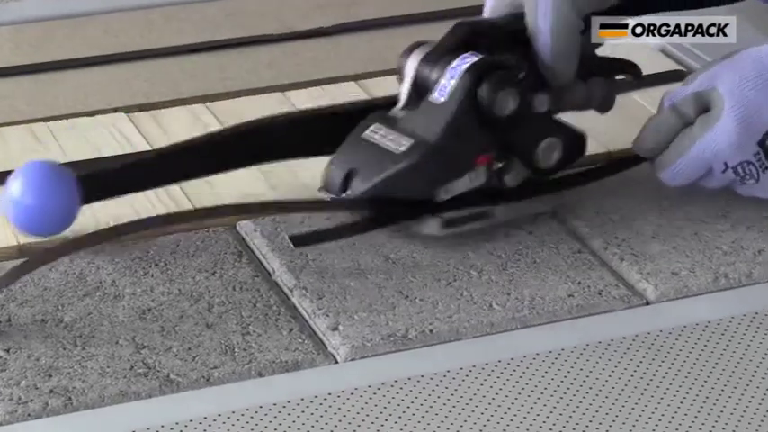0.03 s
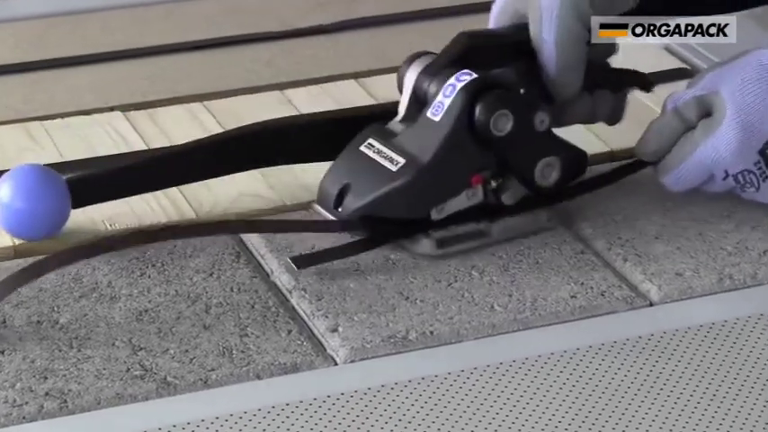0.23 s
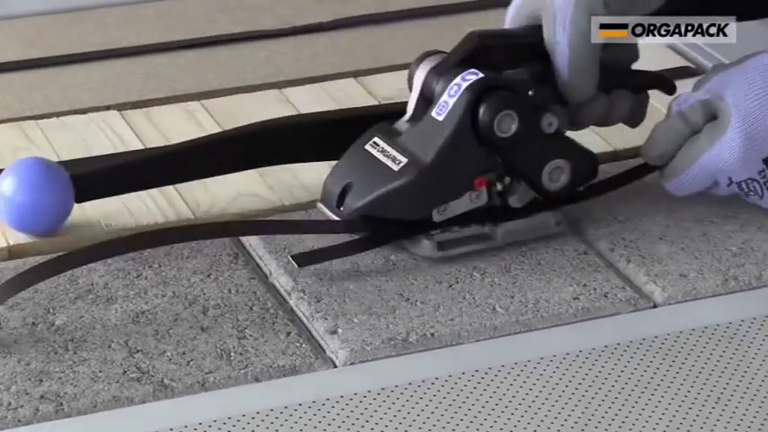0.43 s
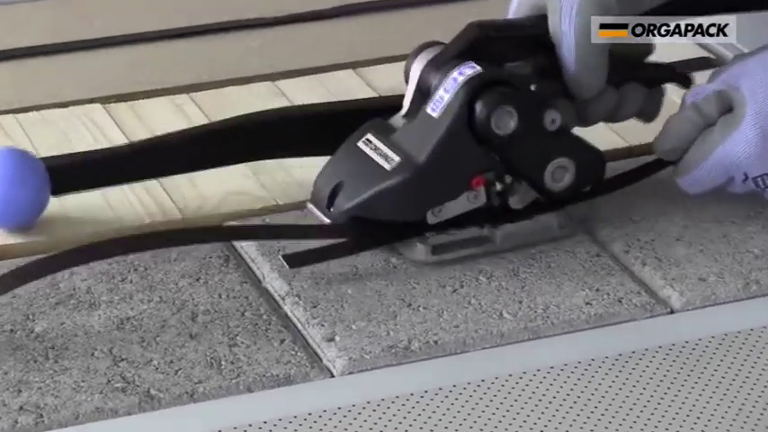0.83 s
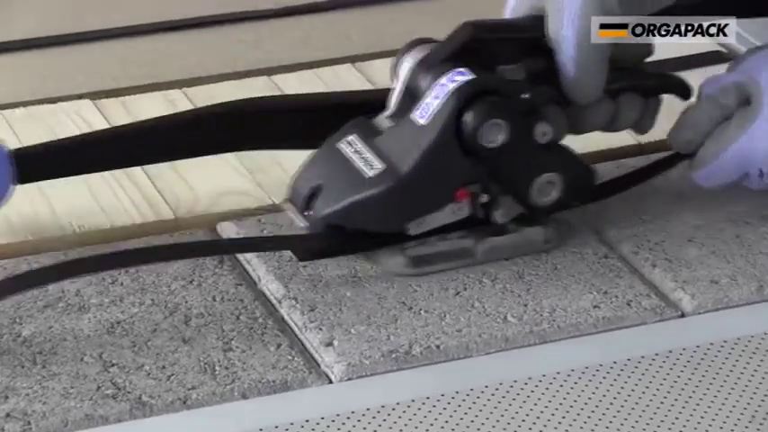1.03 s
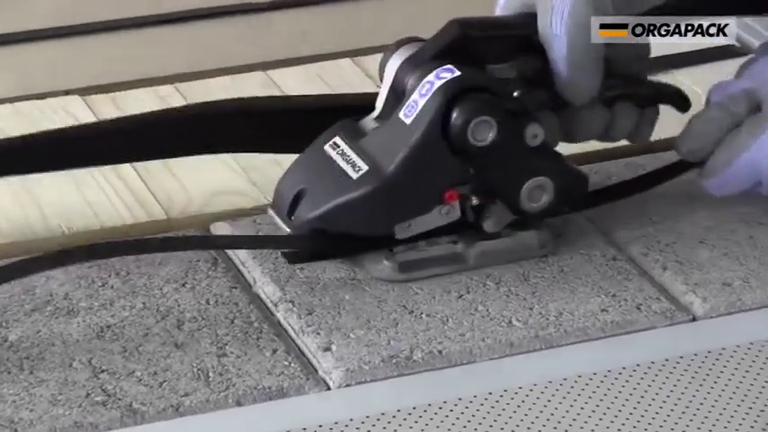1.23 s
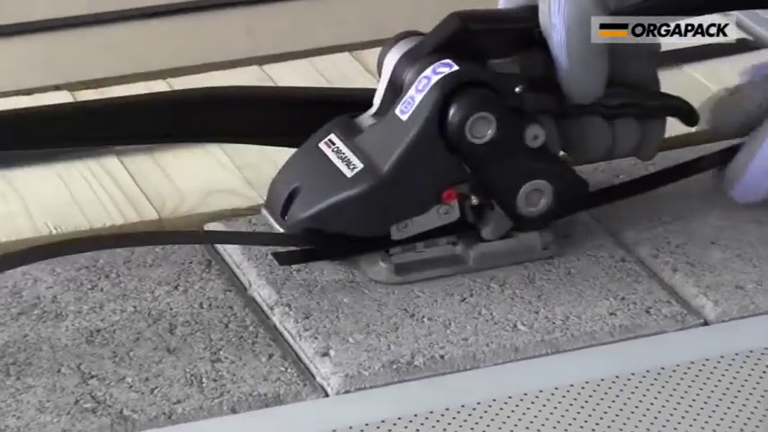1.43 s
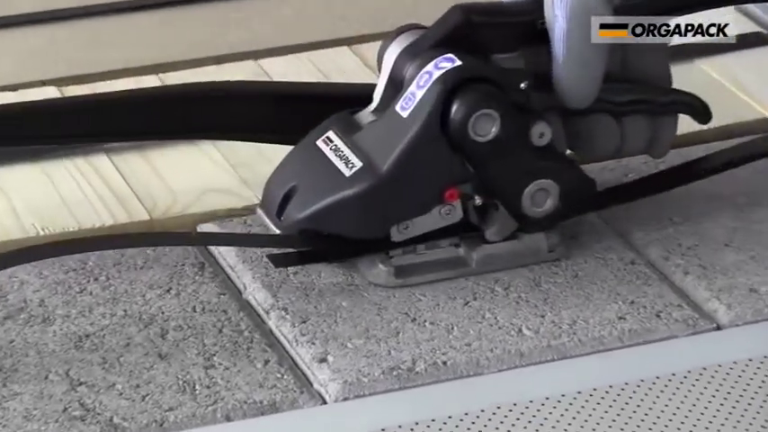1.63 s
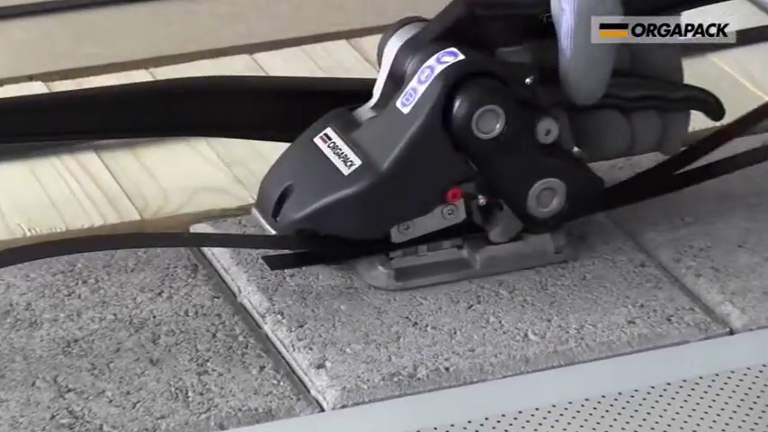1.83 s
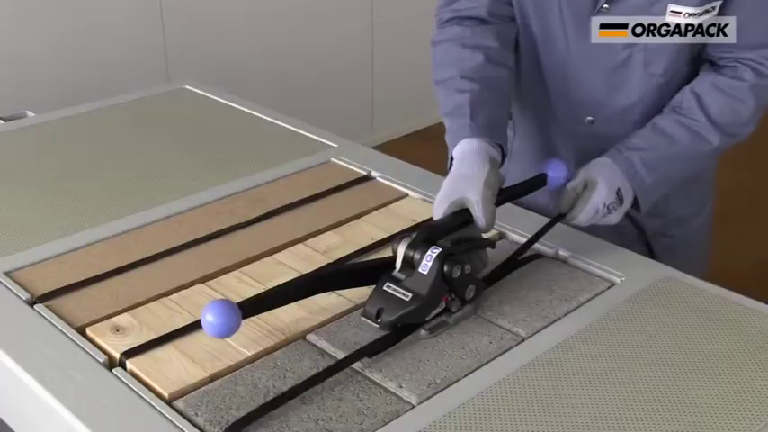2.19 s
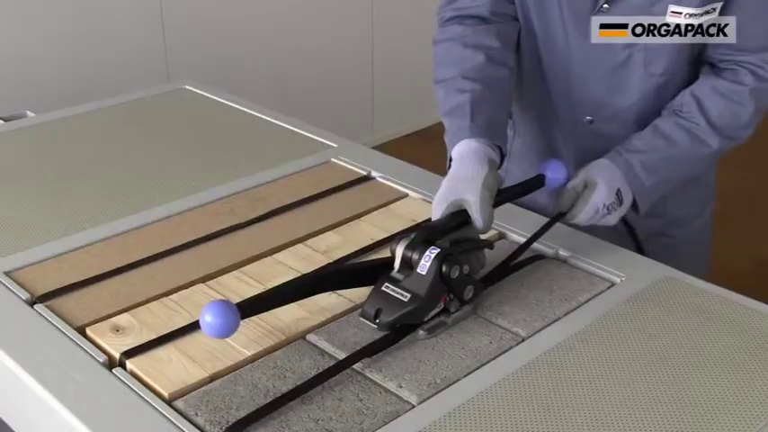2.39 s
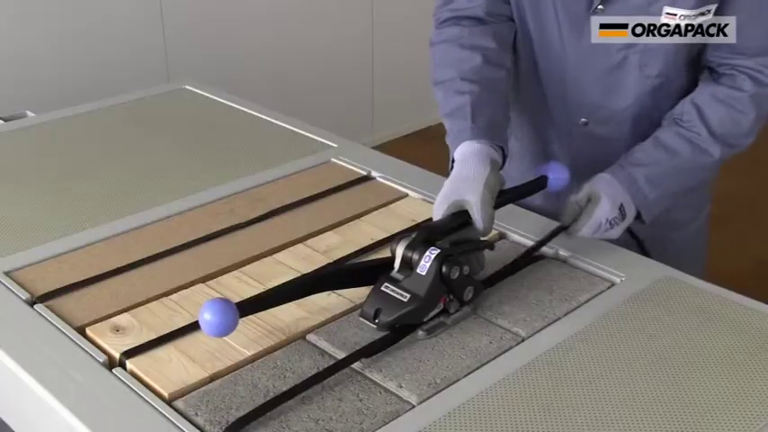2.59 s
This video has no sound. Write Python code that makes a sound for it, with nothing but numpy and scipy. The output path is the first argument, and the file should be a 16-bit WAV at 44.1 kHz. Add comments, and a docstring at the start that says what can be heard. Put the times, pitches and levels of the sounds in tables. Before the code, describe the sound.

A hand strapping tool knocks down onto paving stones from 0.2 seconds, steel strap clashing in its jaws, loudest between 0.8 and 1.1 seconds. The table beneath rings, and softer bumps and strap rubbing follow. From 1.9 to 2.25 seconds the ratchet gives a quickening run of sharp clicks, then snaps home at 2.5 seconds. The workshop echoes and ventilation hums quietly throughout.

```python
"""An echoing workshop, with ventilation humming in the background.
A hand strapping tool is set down on a load of pavers and planks: its base knocks and the table rings.
Steel strap slides through a hand and clashes into the tool's jaws. Then the lever swings, and the pawl
(a small steel catch) drops over the ratchet teeth in a quickening run of clicks before it snaps home."""
import sys
import numpy as np
from scipy import signal
from scipy.fft import rfft, irfft
from scipy.io import wavfile

SR = 44100
rng = np.random.default_rng(int(sys.argv[2]) if len(sys.argv) > 2 else 0)


def store_pcm(level_fs):
    """Save levels as 16-bit WAV."""
    pcm = np.round(np.clip(level_fs, -1, 1) * 32767).astype(np.int16)
    wavfile.write(sys.argv[1], SR, np.atleast_2d(pcm).T)


N = 121275

# Dull knocks and rubs. Each row: start in seconds, level in dB, rise and fade times in seconds,
# thin below this Hz, dull above this Hz, table ring in dB, contact resonance in Hz, its height in dB.
# A fade time is how long a sound takes to fall by 60 dB.
KNOCKS = [(.2025, -15.5, 0.00069, 0.051, 373, 1700, -21, 643, 11.5),
          (.281, -20, 0.0076, 0.23, 340, 1030, 8, 456, 7), (.639, -15, 0.0066, .24, 308, 1080, -2, 357, 7),
          (.8268, -8, .0005, 0.078, 240, 1970, -12.5, 635, 7),
          (.894, -9.5, 0.0033, .24, 248, 1750, -3, 333, 6),
          (.956, -12.5, 0.00056, 0.075, 540, 1840, -9, 1400, 0),
          (1.0588, -7, 0.0012, 0.13, 357, 1640, -12.5, 1070, 6.5),
          (1.078, -15.5, 0.0018, 0.082, 139, 1190, -5, 487, 5),
          (1.093, -12.5, 0.0045, 0.073, 375, 1250, -4, 760, 0),
          (1.245, -22, 0.0033, 0.23, 129, 920, -6.5, 655, 2.5),
          (1.295, -23, 0.0017, 0.13, 100, 1120, -5, 670, 4),
          (1.385, -27, 0.022, 0.29, 99.2, 688, 2, 353, 9.5),
          (1.588, -30, .002, 0.057, 80, 1280, -18, 131, 9),
          (1.865, -31, 0.029, 0.84, 564, 1290, -4, 810, -4),
          (2.15, -27.5, 0.011, 0.27, 454, 1060, 7.5, 680, 2.5),
          (2.4879, -22, 0.00071, .06, 700, 2310, -17, 1080, -3),
          (2.498, -23.5, 0.00045, 0.032, 795, 2700, -28, 1410, -18)]
# Tone of the sliding strap and of the crack in each click. Each row: frequency in Hz, level in dB.
FRICTION_TONE = [(500, -10), (1500, 5.5), (3000, 1), (5800, -5), (9000, -11.5), (15000, -21)]


def amp(db):
    """Turns decibels into a number to multiply by."""
    return 10 ** (np.asarray(db) / 20)


def unit(x):
    """Scales a signal to an average power of 1."""
    return x / np.sqrt(np.mean(x ** 2) + 1e-20)


def read(points, hz):
    """Reads between the rows of a table, on a pitch-like (logarithmic) frequency scale."""
    row_hz, value = np.transpose(points)
    return np.interp(np.log(hz + 1), np.log(row_hz + 1), value)


def add(mix, start, sound):
    """Mixes a sound in at a start time in seconds."""
    part = mix[max(round(start * SR), 0):][:len(sound)]
    part += sound[:len(part)]


def colour(x, tone, dull_hz=None):
    """Filters a sound to follow a tone curve, and can dull its treble. Only the curve's shape counts."""
    hz = abs(np.fft.fftfreq(4096, 1 / SR))
    gain = amp(read(tone, hz))
    if dull_hz:
        gain = gain / np.sqrt(1 + (hz / dull_hz) ** 6)
    log_gain = np.log(unit(gain) + 1e-5)
    taps = np.fft.ifft(np.exp(np.conj(signal.hilbert(log_gain)))).real  # nothing sounds before a hit
    return signal.fftconvolve(x, taps[:len(taps) // 2])[:len(x)]


def ring(modes, t):
    """Adds up modes (steady pitches that fade away); neighbours swing opposite ways."""
    return sum((-1) ** k * amp(db - 60 * t / fade) * np.sin(2 * np.pi * hz * t)
               for k, (hz, db, fade) in enumerate(modes))


def burst(t, rise, fade):
    """A loudness shape that climbs in a straight line, then dies away."""
    return np.minimum(t / rise, 1) * np.exp(-np.log(1000) * np.maximum(t - rise, 0) / fade)


def thinned(hz, thin_hz):
    """The bass that a light, glancing blow lacks, in dB."""
    return -10 * np.log10(1 + (thin_hz / hz) ** 4)


def bump(hz, peak_hz, peak_db, width_octaves=0.11):
    """The narrow peak or dip that one point of contact gives to the tone, in dB."""
    return peak_db * np.exp(-(np.log2(hz / peak_hz) / width_octaves) ** 2)


def spread(mid, side, width):
    """Makes left and right from a shared part and a part that differs."""
    return np.array([mid + width * side, mid - width * side]) / np.sqrt(1 + width ** 2)


def ventilation():
    """Rushing air with a low hum and a faint tone; the rush steps up a little near the end."""
    # Tone of the moving air. Each row: frequency in Hz, level in dB.
    air_tone = [(20, -23), (45, -18), (75, -19.5), (110, -4.5), (180, 3.5), (300, -5), (500, -5),
                (800, -9.5), (1400, -12.5), (2500, -26), (6000, -33.5), (15000, -47.5)]
    # Low ventilation hum, plus a faint steady tone near the table's ringing pitch.
    # Each row: centre in Hz, level in dB, width in Hz.
    tone_bands = [(190.4, -43.5, 14.5), (489, -51.5, 18), (74.1, -50.5, 6)]
    hz = np.fft.rfftfreq(N, 1 / SR)

    def noise(gain):
        return unit(irfft(rfft(rng.standard_normal(N)) * gain, N))
    air_gain = amp(read(air_tone, hz))
    side_gain = air_gain * np.minimum(.5 + hz / 1000, 2)  # the treble is wider than the bass
    air = spread(noise(air_gain), noise(side_gain), width=0.32)
    tones = sum(amp(db) * noise(1 / (1 + (2 * (hz - centre) / width) ** 2))
                for centre, db, width in tone_bands)
    step_up = np.clip((np.arange(N) / SR - 1.88) / 0.036, 0, 1)  # begins at 1.88 seconds
    return amp(-39 + 2.5 * step_up) * air + tones


def room_tail(width, build_s):
    """Countless blurred echoes take a moment to build, then die at their own speed in each band."""
    # How long the room rings. Each row: frequency in Hz, fade time in seconds.
    fade_times = [(150, 2.5), (350, 1.38), (700, 1.56), (1400, 1.38), (2200, 1.62), (5500, 0.84),
                  (8000, 0.61), (14000, 0.15)]
    # Tone of the room. Each row: frequency in Hz, level in dB.
    room_tone = [(100, -1.5), (500, 2.5), (1200, -1), (2500, 1), (5000, -4), (8000, -0.5), (14000, 8)]
    hz, t, bands = signal.stft(rng.standard_normal((2, 3 * SR // 2)), SR, nperseg=256)
    decay = np.exp(-np.log(1000) * t / read(fade_times, hz)[:, None])
    _, tail = signal.istft(bands * decay * amp(read(room_tone, hz))[:, None], SR, nperseg=256)
    build = np.minimum(np.arange(tail.shape[1]) / SR / build_s, 1)
    mid, side = tail * build / np.sqrt(SR / 10)
    return spread(mid, side, width)


def room(source, tail_db, width, build_s=0.0069, count=3):
    """Direct sound, first echoes and tails: each direction gets its own version of the source."""
    # The first echoes. Each row: delay in seconds, level in dB.
    echoes = [(.0108, -7), (.0128, -13), (.0188, -19)]
    directions = [source() for _ in range(count)]
    tails = sum(signal.fftconvolve(x[None], room_tail(width, build_s), axes=1)[:, :N]
                for x in directions)
    out = amp(tail_db) / np.sqrt(count) * tails
    for k, (delay, db) in enumerate(echoes):
        for channel, share in zip(out, spread(0.83, (-1) ** k, width)):  # lean left and right in turn
            add(channel, delay, amp(db) * share * directions[k % count])
    return out + directions[0]


def table_ring():
    """Each knock sets the table ringing; the ring swells more slowly after a soft contact."""
    # The table's natural tones. Each row: frequency in Hz, level in dB, fade time in seconds.
    modes = [(132.5, -15.5, 2.1), (183.3, -17, 0.94), (236, -8, 2.04), (320.7, -26, 1.6), (354, -11, 1.42),
             (410, -34, 0.42), (478.5, -2, 0.79), (558, -15, 1.4), (666, -8.5, 1), (714, -10, 0.21),
             (751, -23, 0.92), (815, -32, 0.41), (976, -21, 0.74), (1170, -31, 0.77), (1400, -34, 0.49)]
    out, t = np.zeros(N), np.arange(SR) / SR
    tones = np.array([ring([mode], t) for mode in modes])
    hz = np.array(modes)[:, 0]
    for start, db, rise, _, thin_hz, _, ring_db, peak_hz, peak_db in KNOCKS:
        shares = amp(thinned(hz, thin_hz) + bump(hz, peak_hz, peak_db)) * (-1) ** np.arange(len(hz))
        swell = np.minimum(t / (3.3 * rise), 1)
        add(out, start, amp(db + ring_db - 4) * (shares @ tones) * swell)
    return out


def knocks_and_rubs():
    """Dull bursts of chatter: the base landing, a soft rub, the thud of the pawl snapping home."""
    # Tone that all knocks share. Each row: frequency in Hz, level in dB.
    knock_tone = [(50, -37), (120, -8), (220, 1.5), (380, -2), (500, -5.5), (650, -0.5), (950, -1.5),
                  (1350, -3.5), (1750, -10.5), (2300, -17.5), (4000, -19), (15000, 6)]
    out, t, hz = np.zeros(N), np.arange(SR // 3) / SR, np.geomspace(40, 16000, 120)
    for start, db, rise, fade, thin_hz, dull_hz, _, peak_hz, peak_db in KNOCKS:
        chatter = rng.choice([-1., 1.], len(t)) * burst(t, rise, fade)
        levels = read(knock_tone, hz) + thinned(hz, thin_hz) + bump(hz, peak_hz, peak_db)
        add(out, start, amp(db) * colour(chatter, np.c_[hz, levels], dull_hz))
    return out


def strap_slides():
    """Soft swells of rubbing noise as the strap is drawn through the hand."""
    # Pulls on the strap. Each row: middle in seconds, half length in seconds, level in dB.
    pulls = [(0, 0.22, -46), (1.603, 0.18, -47), (1.916, 0.029, -37.5), (2.086, 0.066, -32.5)]
    t = np.arange(N) / SR
    swells = sum(amp(db) * np.exp(-((t - middle) / half) ** 2) for middle, half, db in pulls)
    return swells * colour(rng.standard_normal(N), FRICTION_TONE)


def strap_clashes():
    """Strap and jaws meet in bursts of tiny bright contacts."""
    # Steel hitting steel. Each row: start in seconds, level in dB, rise and fade times in seconds,
    # dull above this Hz, contact resonance in Hz, its height in dB.
    clashes = [(0.2021, -40, .0005, 0.096, 6000, 2420, 17), (.256, -40, .002, 0.13, 11640, 3100, 13),
               (.262, -42.5, 0.018, .2, 4430, 3180, 7), (0.415, -38, 0.0017, 0.026, 10800, 8600, 14),
               (.425, -33.5, .001, 0.034, 7000, 4200, 5), (0.461, -43, 0.0015, 0.17, 5900, 4500, -1),
               (.660, -40.5, 0.0029, 0.097, 13000, 4450, 9), (.673, -25.5, 0.0028, 0.027, 11000, 4040, 6),
               (0.683, -34, 0.0051, 0.13, 11900, 9000, -1), (0.708, -32, 0.0027, 0.066, 12000, 8500, 10),
               (.811, -37, .002, .04, 5000, 3060, 12), (0.826, -36.5, 0.0006, 0.27, 6400, 4500, 9),
               (0.886, -24, 0.0011, 0.035, 7000, 3220, 20),
               (0.889, -9.5, 0.00056, 0.026, 10100, 6030, -0.5),
               (0.901, -28.5, 0.0017, 0.074, 10100, 4700, 10), (1.045, -16, 0.0018, 0.046, 13000, 8800, 11),
               (1.062, -15, 0.004, 0.12, 16000, 4240, 4), (1.414, -38.5, 0.0011, 0.038, 12000, 9000, 4),
               (1.63, -44, 0.023, 0.17, 7500, 2100, 17)]
    # Tone of the steel. Each row: frequency in Hz, level in dB.
    steel_tone = [(300, -24), (1500, 0), (3000, -1), (4000, -1), (6000, -0.5), (8500, -4.5), (11000, -4.5),
                  (13000, -1.5), (16000, -6)]
    out, t, hz = np.zeros(N), np.arange(SR // 3) / SR, np.geomspace(300, 16000, 90)
    for start, db, rise, fade, dull_hz, peak_hz, peak_db in clashes:
        sizes = np.repeat(rng.standard_normal(len(t)), 16)[:len(t)]  # a new contact every 16 samples
        grain_db = 5 * np.clip(sizes, -2, 2)
        grains = unit(rng.standard_normal(len(t)) * amp(grain_db))
        levels = read(steel_tone, hz) + bump(hz, peak_hz, peak_db)
        add(out, start, amp(db) * colour(grains * burst(t, rise, fade), np.c_[hz, levels], dull_hz))
    return out


def click(modes):
    """A steel catch lands with a crack, rings briefly and bounces once."""
    longest_fade = max(fade for _, _, fade in modes)
    t = np.arange(0, longest_fade + .01, 1 / SR)
    crack = amp(-18.5) * rng.standard_normal(SR)[:len(t)] * burst(t, rise=.0001, fade=0.0023)
    landing = ring(modes, t) + colour(crack, FRICTION_TONE)
    out = landing.copy()
    bounce_s = .0009 * rng.uniform(0.46, 1.6)
    add(out, bounce_s, amp(-3) * landing)
    return out


def ratchet():
    """The pawl drops over each tooth, shaking the housing, then snaps home; faint high tones linger."""
    # Drops over the teeth. Each row: start in seconds, level in dB, housing rattle in dB.
    teeth = [(1.904, -11.5, -26.5), (1.9644, -11, -21), (2.0056, -11.5, -22), (2.0312, -7, -19),
             (2.0512, -17, -19), (2.0732, -8.5, -19), (2.0936, -7.5, -19), (2.1137, -10, -16.5),
             (2.133, -10.5, -20.5), (2.1497, -3.5, -20.5), (2.1638, -1.5, -21.5), (2.176, -1, -27),
             (2.1872, -4, -27.5), (2.1984, -1.5, -26), (2.2122, -4.5, -34), (2.2374, -2, -19.5)]
    # The pawl snapping home and settling. Each row: start in seconds, level in dB.
    snaps = [(2.487, -5.5), (2.498, -30)]
    # Three sets of fading tones. Each row: frequency in Hz, level in dB, fade time in seconds.
    pawl_modes = [(1180, -16.5, .006), (2120, -14.5, 0.0085), (3470, -8, .005), (4390, -4.5, 0.0028),
                  (5030, -4.5, 0.0051), (5940, -4.5, 0.0049), (8000, -12, 0.0094), (10800, -17, 0.0056),
                  (14000, -27.5, .005)]  # the pawl on a tooth
    snap_modes = [(1080, -10.5, .016), (1330, -17, 0.011), (2480, -15, 0.0063), (3500, -9.5, 0.0068),
                  (4500, -7, 0.0052), (5160, -3.5, 0.0052), (8120, -6, 0.011), (8060, -41, 0.23),
                  (10500, -16, 0.0034), (13700, -35, .004)]  # the pawl snapping home
    lingering_tones = [(2087, -41, 1.2), (2234, -42, 1), (3477, -43, .9), (4995, -46, .6), (5184, -42, .7),
                       (5986, -43, .6)]  # faint high tones that linger in the room after the clicks
    # Tone of the rattling housing. Each row: frequency in Hz, level in dB.
    housing_tone = [(40, -48), (100, -33), (250, -3.5), (650, 0.5), (1200, 2.5), (1750, -8), (2150, -0.5),
                    (3000, -3), (4500, -10), (8000, -18.5), (15000, -41)]
    pitch_scatter, treble_hz = 0.032, 7000
    out, shake, t = np.zeros(N), np.zeros(N), np.arange(SR // 8) / SR
    lingering = ring(lingering_tones, np.arange(SR) / SR)
    for start, db in snaps:
        add(out, start, amp(db) * click(snap_modes))
        add(out, start, amp(db - 9) * lingering)
    for start, db, rattle_db in teeth:
        modes = []
        for hz, mode_db, fade in pawl_modes:
            detune = 1 + pitch_scatter * rng.standard_normal()
            treble_db = 0.77 * db * (hz > treble_hz)  # harder drops are brighter
            modes.append((hz * detune, mode_db + treble_db, fade))
        add(out, start, amp(db - 1) * click(modes))
        add(out, start, amp(db) * rng.choice([-1., 1.]) * lingering)
        rattle = rng.standard_normal(len(t)) * burst(t, rise=0.00054, fade=0.041)
        add(shake, start, amp(rattle_db) * rattle)
    return out + colour(shake, housing_tone)


def scene():
    """Tool and strap echo in the workshop, over the ringing table and the ventilation."""
    lean_left = amp([[.5], [-.5]])
    clicks = room(ratchet, tail_db=.5, width=0.47, build_s=0.019) * lean_left
    strap = room(lambda: strap_clashes() + strap_slides(), tail_db=-0.1, width=0.47)
    knocks = room(knocks_and_rubs, tail_db=-1, width=0.39)
    return knocks + table_ring() + strap + clicks + ventilation()


def record(dry):
    """Gently squashes the loudest peaks, then cuts the very highest treble."""
    ceiling, top_hz = 0.6, 15800
    squashed = dry / (1 + (dry / ceiling) ** 4) ** .25
    low_pass = signal.firwin(301, top_hz, window=("kaiser", 9), fs=SR)
    return signal.oaconvolve(squashed, low_pass[None], "same")


dry = scene()
out = record(dry)
store_pcm(out)
```